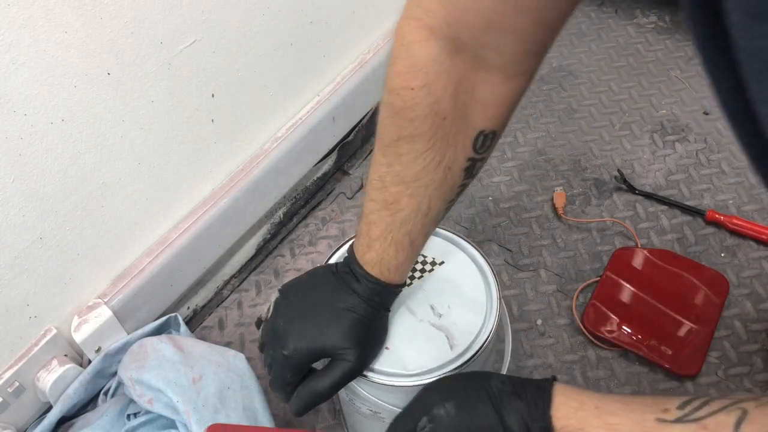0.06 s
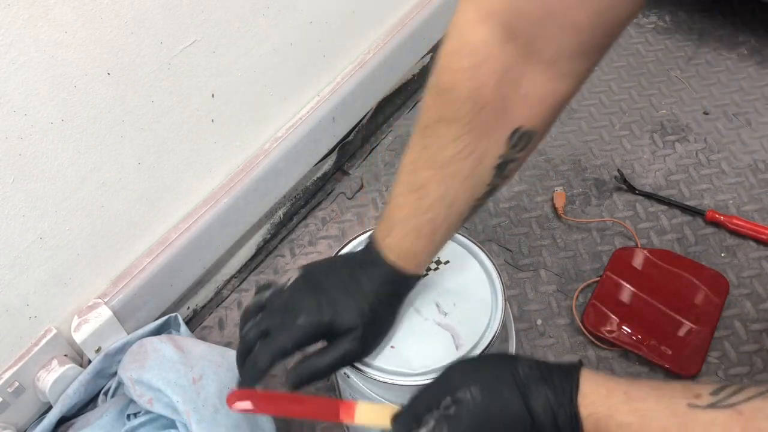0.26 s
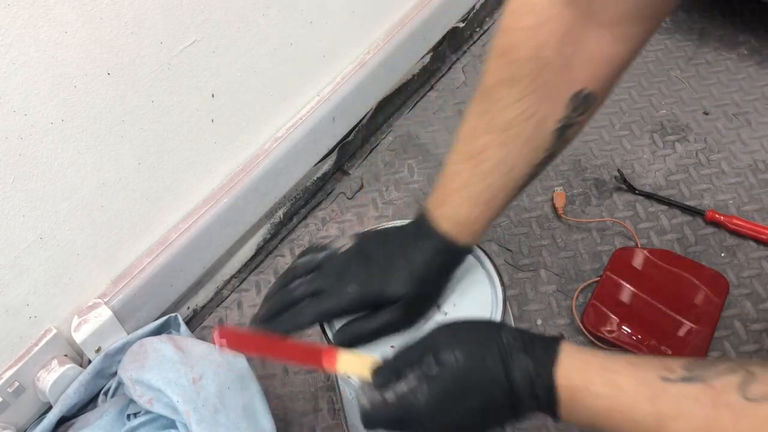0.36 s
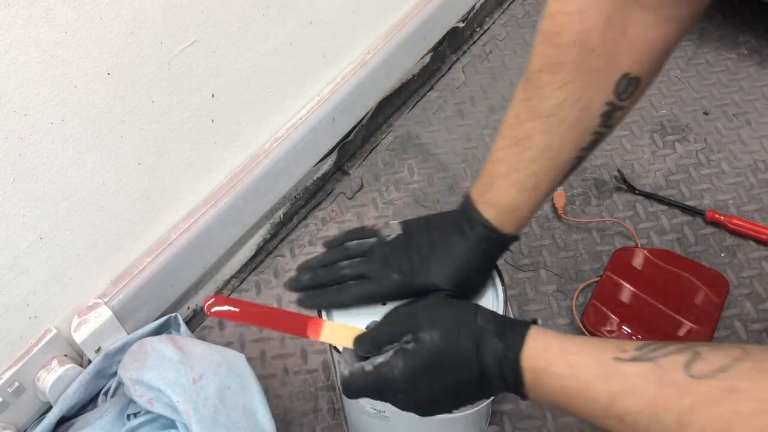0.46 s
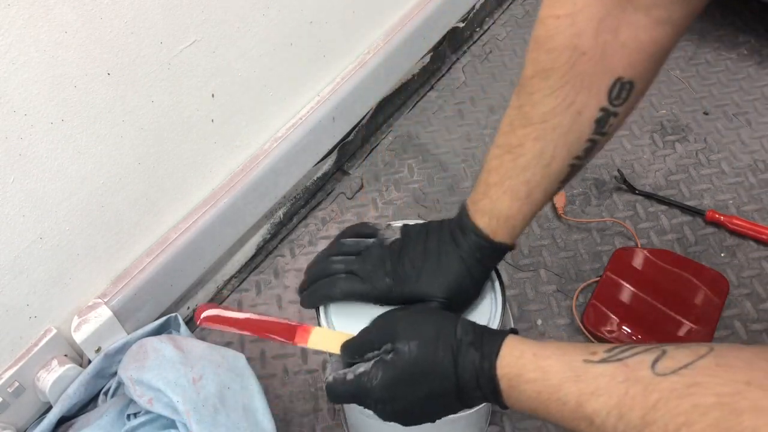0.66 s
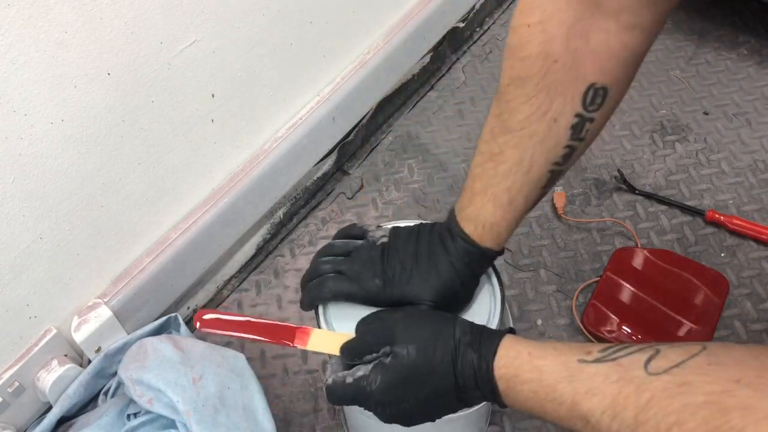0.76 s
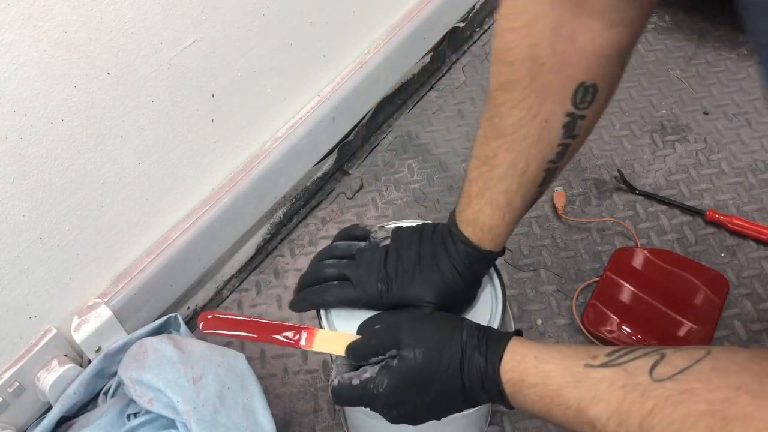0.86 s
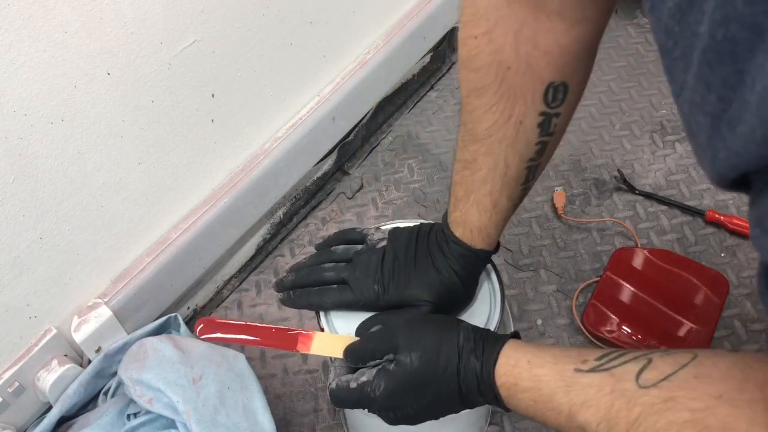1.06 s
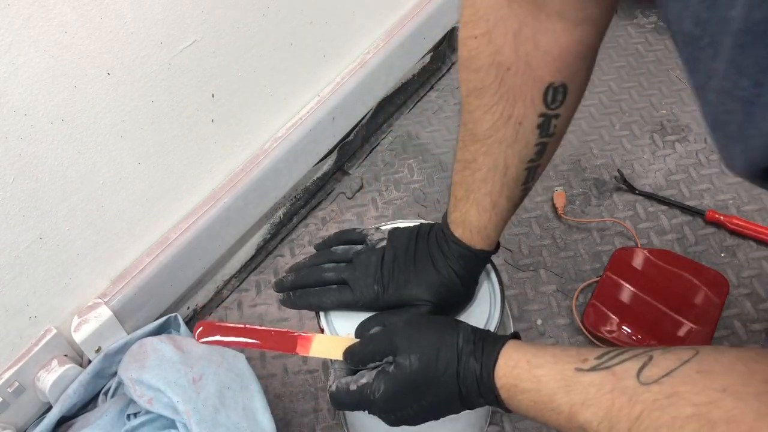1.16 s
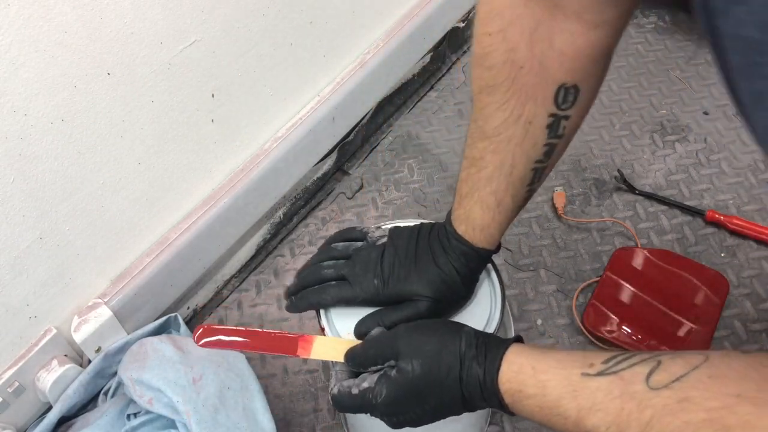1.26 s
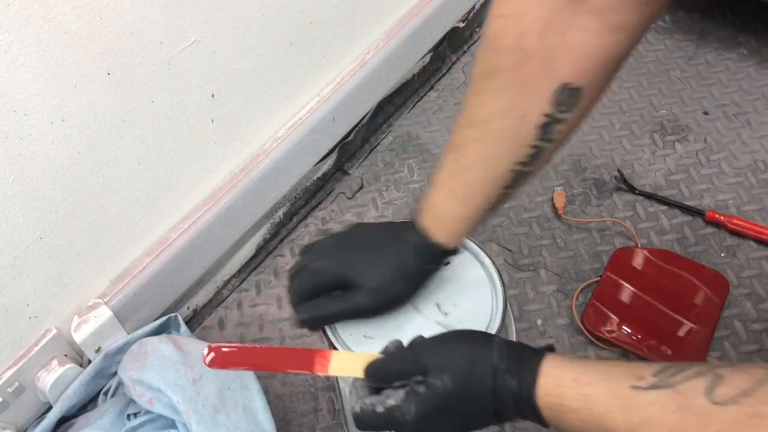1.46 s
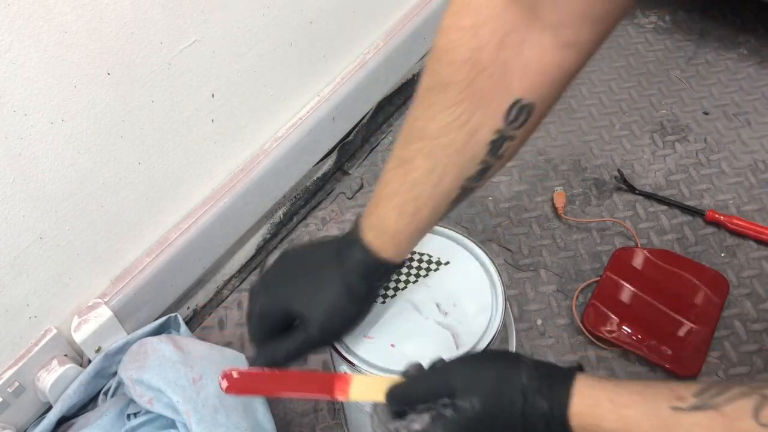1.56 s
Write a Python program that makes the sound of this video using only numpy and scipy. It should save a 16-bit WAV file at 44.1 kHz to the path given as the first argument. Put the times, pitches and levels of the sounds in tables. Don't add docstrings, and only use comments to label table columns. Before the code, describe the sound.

Hollow metallic knock on a full paint tin, glove rubbing, sharp rim snap, duller final thump.

```python
import sys
import numpy as np
from scipy import signal
from scipy.io import wavfile
from scipy.ndimage import uniform_filter1d

SR = 44100
rng = np.random.default_rng(int(sys.argv[2]) if len(sys.argv) > 2 else 0)


def wrap_up_sound(samples):
    columns = np.atleast_2d(samples).T
    tamed = np.clip(columns, -1, 1)
    steps = np.round(tamed * 32767).astype(np.int16)
    wavfile.write(sys.argv[1], SR, steps)


N = 72765


def from_db(db):
    return 10 ** (np.asarray(db) / 20)


def rms_one(x):
    return x / np.sqrt(np.mean(x ** 2) + 1e-20)


def in_time(rows):
    s, *columns = np.transpose(rows)
    return [np.interp(np.arange(N) / SR, s, c) for c in columns]


def filtered(x, kind, order, hz):
    return signal.sosfilt(signal.butter(order, hz, kind, fs=SR, output="sos"), x)


def drift(rate_hz):
    r = np.exp(-2 * np.pi * rate_hz / SR)
    slow = signal.lfilter([1], [1, -2 * r, r * r], rng.standard_normal(2 * N))[N:]
    return rms_one(slow)


def resonance(x, hz, width_hz):
    r = np.exp(-np.pi * width_hz / SR)
    return signal.lfilter([1, 0, -1], [1, -2 * r * np.cos(2 * np.pi * hz / SR), r * r], x)


def coloured(spectrum, patchy_db, rate_hz):
    out, together = 0, drift(rate_hz)
    edges = 22 * 2 ** np.arange(0, 9.9, .5)
    white = rng.standard_normal((2, N))
    hz, db = np.transpose(spectrum)
    for k, (low, high) in enumerate(zip(edges, edges[1:])):
        band = filtered(white[k % 2], "band", 2, [low, high])
        centre = np.log(low * high) / 2
        level_db = np.interp(centre, np.log(hz), db, left=db[0] - 1.0)
        flicker_db = patchy_db * (0.49 * together + drift(rate_hz))
        out = out + from_db(level_db + flicker_db) * band
    return rms_one(out)


def struck(modes, contacts, uneven_db=3.65):
    out = np.zeros(N)
    t = np.arange(SR // 2) / SR
    hz, level_db, t60 = np.transpose(modes)[:, :, None]
    for s, db, soft_hz, direction in contacts:
        gain = direction * from_db(db + level_db + uneven_db * rng.standard_normal(hz.shape))
        decay = from_db(-60 * t / t60)
        rings = np.sum(gain * decay * np.sin(2 * np.pi * hz * t), axis=0)
        rings = signal.lfilter(*signal.butter(2, min(soft_hz, 20000), fs=SR), rings)
        start = int(s * SR)
        out[start:start + len(t)] += rings[:N - start]
    return out


def puffs(events):
    out, t = np.zeros(N), np.arange(N) / SR
    for s, db, hz, width_hz, length in events:
        age = np.maximum(t - s + length / 4, 0) / (length / 4)
        shape = age * np.exp(1 - age) ** 0.59
        band = np.clip([hz - width_hz / 2, hz + width_hz / 2], 100, 20000)
        puff = shape * filtered(rng.standard_normal(N), "band", 2, band)
        out += from_db(db) * puff * np.sqrt(np.sum(shape ** 2) / np.sum(puff ** 2))
    return out


# (time [s], level [dB])
SLIDE_LEVEL = [(0, -73), (.26, -71.5), (.285, -55.5), (.33, -70), (.405, -75), (.42, -62), (.49, -60),
               (.58, -61), (.7, -53.5), (.78, -59), (.9, -65), (1.0, -62.5), (1.2, -67.5), (1.415, -64),
               (1.43, -57), (1.49, -58.5), (1.51, -69), (1.65, -66)]
# (frequency [Hz], density [dB per Hz])
SLIDE_COLOUR = [(1180, -40), (2000, -3), (3490, -6), (3870, -3), (5780, -10), (15100, -13), (16000, -11)]


def glove_sliding():
    rub = from_db(in_time(SLIDE_LEVEL)[0]) * coloured(SLIDE_COLOUR, patchy_db=1.5, rate_hz=36.0)
    return signal.sosfilt(signal.cheby2(10, 30, 16100, fs=SR, output="sos"), rub)


# (frequency [Hz], density [dB per Hz])
ROOM_COLOUR = [(24, -25), (40, 1.5), (104, -5.5), (479, -17), (942, -9), (2050, -21), (2440, -26),
               (3470, -30), (16000, -65)]
# (time [s], level [dB])
ROOM_LEVEL = [(0, -54.5), (.2, -53.5), (.4, -52), (1.65, -52.5)]


def room_noise():
    return from_db(in_time(ROOM_LEVEL)[0]) * coloured(ROOM_COLOUR, patchy_db=1.22, rate_hz=9.4)


# (frequency [Hz], bandwidth [Hz], level [dB])
HUM = [(59.8, 38, -57), (286, 99, -62), (399, 51, -68)]


def low_hum():
    out = 0
    for hz, width_hz, db in HUM:
        out = out + from_db(db) * rms_one(resonance(rng.standard_normal(N), hz, width_hz))
    return out


# (frequency [Hz], level [dB], decay time T60 [s])
LID_FREE = [(121.4, -17, 0.3), (186, -3.5, 0.19), (261.7, -3.5, 0.19), (429.5, -11, 0.19), (526.6, 2, 0.12),
            (633.2, -1, 0.11), (770, -2, 0.055), (900, 11.5, 0.036), (1084, 4.5, 0.13), (1100, -13, 0.066),
            (1269, -10, 0.073), (1382, -8, 0.14), (1836, -11.5, 0.16), (2890, -25, 0.036)]
# (time [s], level [dB], softness [Hz], direction [sign and share])
FIST = [(.2190, -22, 1300, -0.3), (0.2189, -32, 1270, 0.54), (.2204, -19, 1640, 0.98),
        (0.2219, -21.5, 1400, 0.96), (0.2246, -17, 2300, 0.59), (.2264, -25, 2020, -0.91)]


def fist_on_lid():
    return struck(LID_FREE, FIST)


# (time [s], level [dB], low edge [Hz], high edge [Hz], decay time T60 [s])
RATTLES = [
    (0.2203, -18, 400, 2960, 0.063),
    (0.223, -25.5, 170, 1100, 0.36),
    (.224, -36, 1400, 3160, 0.15),
    (1.0424, -27.5, 2000, 13000, 0.03),
    (1.047, -43, 2880, 8800, 0.27),
    (1.047, -46, 800, 1900, 0.42),
    (1.3844, -39, 700, 1900, 0.09),
    (1.388, -39.5, 250, 800, .45),
    (.856, -39, 127, 400, 0.28),
]


def rattles():
    out, t = np.zeros(N), np.arange(N) / SR
    for s, db, low_hz, high_hz, t60 in RATTLES:
        noise = filtered(rng.standard_normal(N), "band", 3, [low_hz, min(high_hz, 20000)])
        age = np.maximum(t - s, 0)
        onset = 1 - np.exp(-age / 0.00096)
        out += rms_one(noise) * from_db(db - 60 * age / t60) * onset
    return out


# (frequency [Hz], level [dB], decay time T60 [s])
WALL = [(1513, -12, .12), (1640, -6, .12), (1868, -6, .14), (2205, -3, .07), (2536, -7, .1), (2750, 2, .05),
        (2912, -5, .05), (3268, -17, .07), (3946, -18, .08)]
# (time [s], level [dB], softness [Hz], direction [sign])
WALL_HITS = [(.2215, -30, 4000, 1), (.2238, -27, 4000, -1), (.2290, -33, 4000, 1), (1.3850, -52, 3500, 1),
             (1.3872, -50, 3000, -1)]


def wall_ringing():
    return struck(WALL, WALL_HITS)


# (time [s], level [dB], centre [Hz], bandwidth [Hz], length [s])
RUB_BURSTS = [(.515, -66, 4400, 150, 0.1), (0.585, -60, 3820, 200, .07), (1.573, -64.5, 3930, 500, 0.093),
              (0.417, -63, 13400, 3240, 0.018), (0.45, -50, 290, 120, 0.03), (.575, -54, 2200, 2600, .06),
              (1.14, -62, 385, 30, .15), (0.463, -56, 2300, 300, 0.012)]


def rub_bursts():
    return puffs(RUB_BURSTS)


# (time [s], level [dB], centre [Hz], bandwidth [Hz], length [s])
TICKS = [(0.418, -56, 3850, 450, 0.008), (0.425, -47, 293, 300, 0.014), (0.432, -53, 3880, 400, 0.005),
         (.467, -54, 4800, 600, 0.009), (.468, -55, 342, 300, .01), (.44, -58, 3830, 250, .012),
         (.834, -62, 5200, 900, .008), (0.58, -50, 1520, 250, 0.042), (0.571, -46.5, 352, 200, 0.036),
         (0.9308, -47, 8950, 14500, 0.0016), (0.943, -54, 9000, 14500, 0.0015),
         (0.9748, -41, 9000, 12000, 0.002), (0.9845, -48, 8000, 13000, 0.004),
         (1.157, -46.5, 2290, 500, 0.005), (1.156, -49.5, 4440, 2480, 0.0033),
         (1.387, -45.5, 8800, 12000, 0.0021)]


def ticks():
    return puffs(TICKS)


# (frequency [Hz], level [dB], decay time T60 [s])
EDGE = [(330, -10, .03), (800, -4, .01), (1080, 1, .018), (1450, -2, .014), (1900, -6, .01),
        (2400, -5, .02), (3830, -12, .025), (4800, -14, .015)]
# (time [s], level [dB], softness [Hz], direction [sign])
TAPS = [(.4178, -48, 6000, 1), (.4235, -52, 6000, 1), (.4385, -41, 2200, 1), (.4490, -41, 4000, -1),
        (.4620, -45, 2000, 1), (.4665, -48, 8000, 1), (.5141, -44, 2500, 1), (.5428, -42, 1400, 1),
        (.5670, -37, 3500, -1), (.5698, -38, 3000, -1), (.596, -46, 3000, 1), (.6085, -45, 2500, 1)]


def taps_on_edge():
    return struck(EDGE, TAPS, uneven_db=3.0)


# (frequency [Hz], level [dB], decay time T60 [s])
BODY = [(118, -2, 0.13), (172, -1, 0.09), (232, 4, .05), (430, -8, 0.06), (780, -7, 0.03)]
# (time [s], level [dB], softness [Hz], direction [sign])
PALM = [
    (.8232, -44, 400, 1),
    (.8550, -27, 1300, 1),
    (.8655, -44, 500, 1),
    (.975, -48, 350, 1),
    (1.05, -52, 170, -1),
]


def palm_on_body():
    return struck(BODY, PALM, uneven_db=1.5)


# (frequency [Hz], level [dB], decay time T60 [s])
RIM = [(143, -18, 0.13), (480, -9, 0.03), (960, -3, 0.03), (1090, -5, 0.025), (1400, -13, 0.04),
       (1800, -10, .03), (2230, 2, 0.013), (3220, -10, .012), (3980, 1, 0.014), (5470, -1, 0.011),
       (7280, 0, 0.008), (8140, -1, 0.014), (9080, -7, .01), (9840, -10, .01)]
# (time [s], level [dB], softness [Hz], direction [sign])
SNAP = [
    (1.0410, -42, 5000, 1),
    (1.0428, -30, 12000, -1),
    (1.0437, -23, 16000, -1),
    (1.0447, -26, 1500, -1),
]


def rim_snap():
    return struck(RIM, SNAP, uneven_db=2.1)


# (time [s], frequency [Hz], level [dB])
WHISTLES = [
    [(1.218, 12400, -81.5), (1.224, 12300, -67), (1.262, 12400, -72), (1.305, 13450, -72),
     (1.33, 12900, -78)],
    [(1.332, 12854, -73), (1.342, 12873, -65), (1.362, 12930, -69), (1.412, 11602, -66), (1.42, 11547, -83)],
    [(1.545, 11700, -81), (1.553, 12028, -65), (1.599, 12661, -71), (1.611, 12800, -69), (1.65, 11806, -69)],
]
# (start [s], end [s], start [Hz], middle [Hz], end [Hz], peak level [dB])
JETS = [(1.25, 1.325, 14100, 15600, 14900, -75), (1.23, 1.31, 11000, 11200, 11700, -80),
        (1.565, 1.6, 13700, 14000, 14300, -77), (1.215, 1.25, 15300, 15700, 15800, -79)]


def whistles():
    out, t = np.zeros(N), np.arange(N) / SR
    tracks = [np.array(w) for w in WHISTLES]
    for a, b, start_hz, middle_hz, end_hz, db in JETS:
        tracks.append(np.array([(a, start_hz, db), ((a + b) / 2, middle_hz, db), (b, end_hz, db)]))
    for rows in tracks:
        hz, db = in_time(rows)
        hz = uniform_filter1d(hz, size=500) + 40 * drift(77)
        fade = np.clip(np.minimum(t - rows[0, 0], rows[-1, 0] - t) / .006, 0, 1)
        gain = np.sqrt(2) * fade * from_db(db + 1.6 * drift(40))
        out += gain * np.sin(2 * np.pi * np.cumsum(hz) / SR)
    return out


# (frequency [Hz], level [dB], decay time T60 [s])
LID_SEATED = [(125, -9, 0.076), (173.3, -8.5, 0.11), (260, -3, 0.072), (415.7, 5.5, 0.12), (422, -9, 0.4),
              (590, 2, 0.02), (694, -4, 0.12), (772, -2.5, 0.042), (970, -15, 0.025), (1160, -14, 0.039),
              (1450, -14, 0.1)]
# (time [s], level [dB], softness [Hz], direction [sign and share])
HEEL = [
    (1.3850, -37.5, 1500, 0.77),
    (1.3875, -20.5, 1800, -1.08),
    (1.4115, -33, 1190, 0.76),
]


def heel_on_lid():
    return struck(LID_SEATED, HEEL)


def scene():
    blows = fist_on_lid() + rattles() + wall_ringing() + taps_on_edge()
    blows = blows + palm_on_body() + rim_snap() + heel_on_lid()
    blows = filtered(blows, "high", 4, 118.8)
    background = glove_sliding() + room_noise() + low_hum()
    return (background + blows + rub_bursts() + ticks() + whistles())[None]


def roll_off(x):
    return signal.sosfilt(signal.butter(12, 16620, fs=SR, output="sos"), x)


def record(dry):
    peak, low_hz, top_hz = 1.3, 37.8, 16700
    rounded = peak * np.tanh(dry / peak)
    cut = filtered(rounded, "high", 4, low_hz)
    cut = signal.sosfilt(signal.cheby2(12, 50, top_hz, fs=SR, output="sos"), cut)
    return roll_off(cut)


dry = scene()
out = record(dry)
wrap_up_sound(out)
```